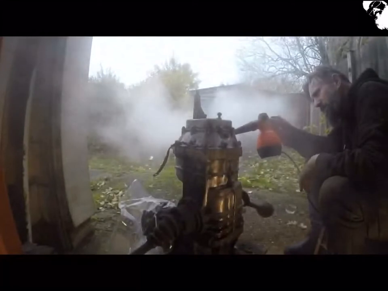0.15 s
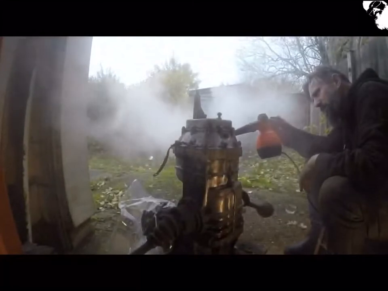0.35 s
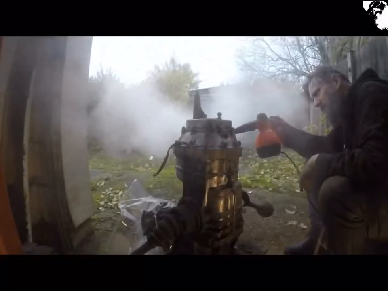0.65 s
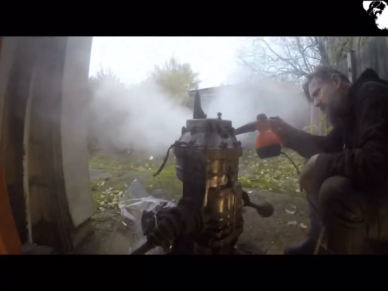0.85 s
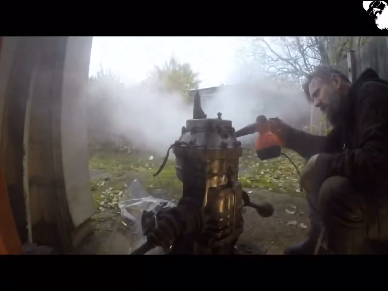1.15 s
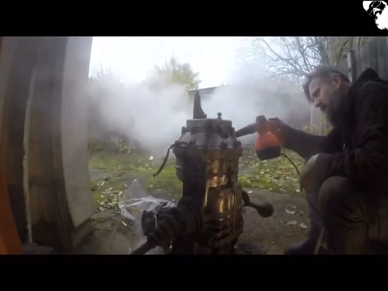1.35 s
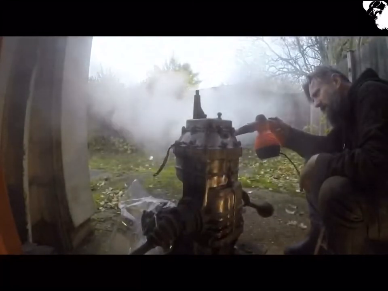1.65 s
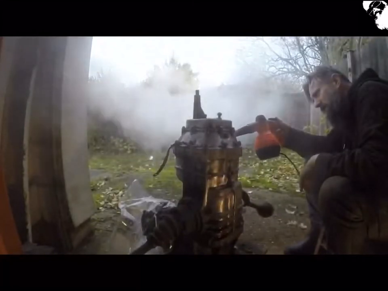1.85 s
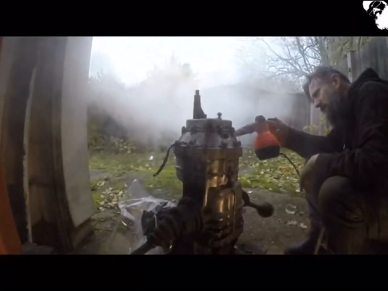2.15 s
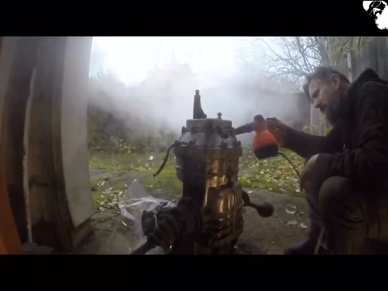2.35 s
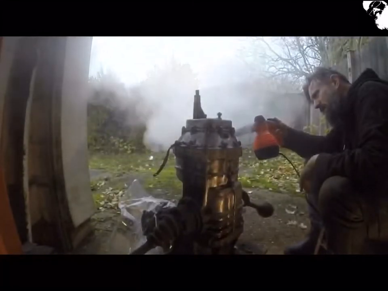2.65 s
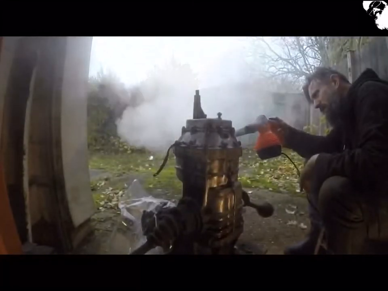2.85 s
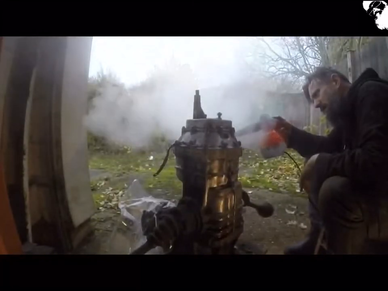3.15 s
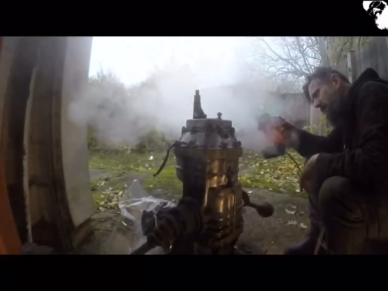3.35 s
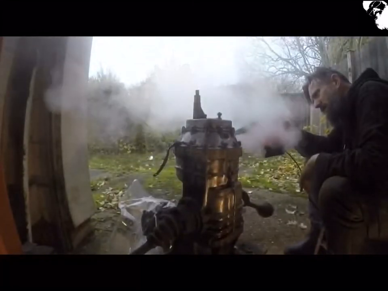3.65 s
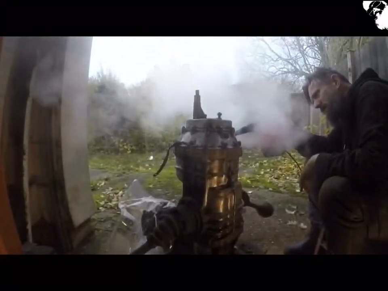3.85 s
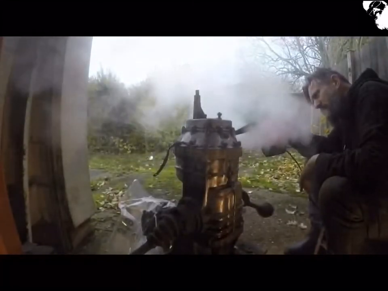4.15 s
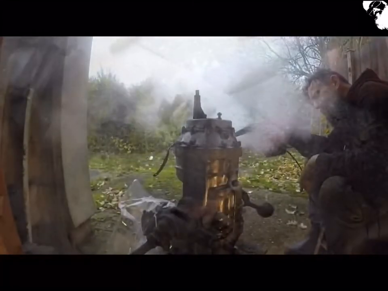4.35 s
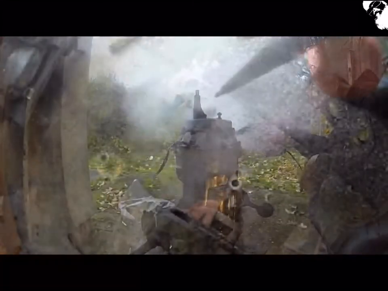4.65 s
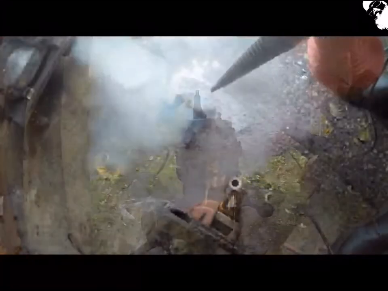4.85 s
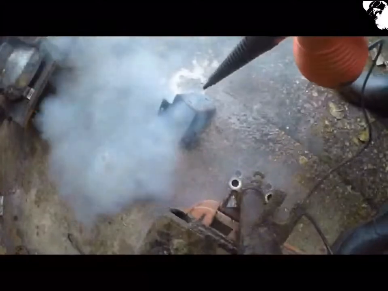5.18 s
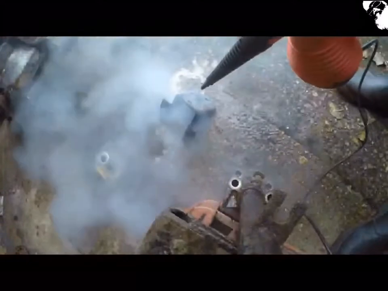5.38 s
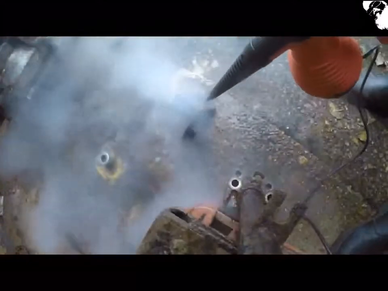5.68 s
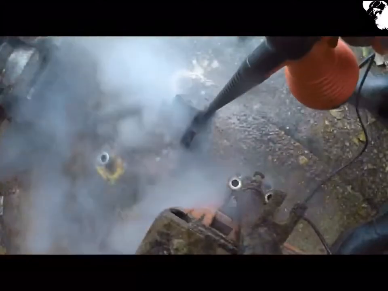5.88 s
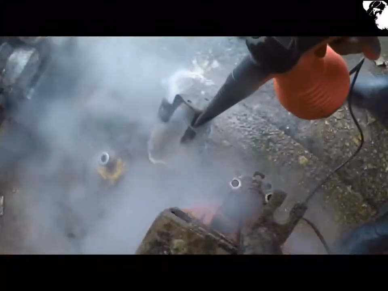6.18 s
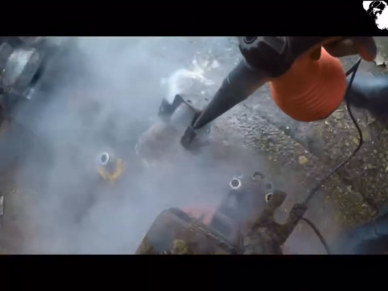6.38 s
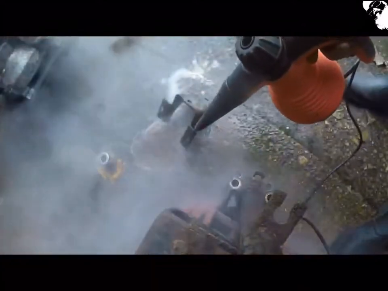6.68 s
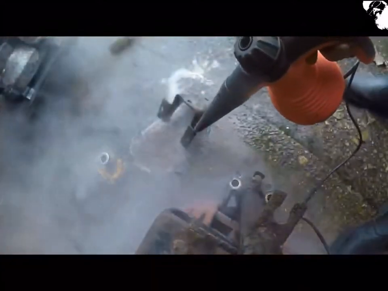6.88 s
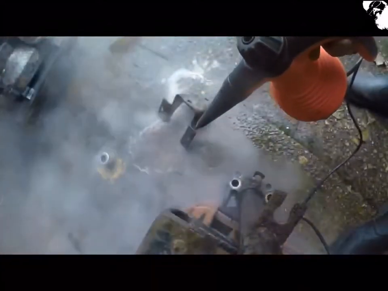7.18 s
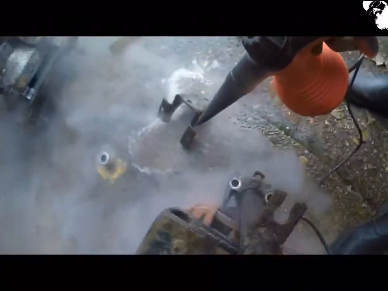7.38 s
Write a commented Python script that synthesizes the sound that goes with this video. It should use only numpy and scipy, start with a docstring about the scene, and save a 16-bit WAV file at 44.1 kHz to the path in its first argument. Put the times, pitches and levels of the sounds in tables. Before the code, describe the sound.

A handheld steam cleaner blasts a metal part in an open yard, without pause. From 0 to 4.4 s it is heard from a couple of metres: a fairly quiet, steady midrange rush with airy nozzle hiss, a wet spit and small rising gurgle around 0.1-0.2 s, more spits near 1.7, 2.8, 3.3 and 4.3 s. Between 2.4 and 3.6 s the aim shifts and the rush becomes narrower and more focused. Brief gusts ring hollows in the metal. At about 4.5 s the perspective jumps close above: louder, hollow roaring in a recess, uneven, with a faint deep hum at the change. From 5.8 s the jet leaves the recess, brighter and stronger; a piercing edge hiss peaks at 6.1 s, then a full wet, crackling wash from 6.2 to 7.05 s, a dip, quick bright surges, and hissing wash to the end. Faint low rumble throughout.

```python
"""A yard, outdoors: a handheld steam cleaner blasts a metal engine part, heard from a couple of metres, then
close above. From afar, coloured noise gives the rush on the metal, which changes with the aim, the nozzle hiss,
spits and a gurgle. Close up, the noise roars in a recess, washes over a wet flat and sings on an edge; random
clicks make its spray crackle. Gusts ring up hollows in the metal, and a late spit and its hiss tail brighten.
Behind lie a steady rumble and two spells of low sine hum. Mono on two channels."""
import sys
import numpy as np
from scipy.fft import rfft, irfft
from scipy.io import wavfile

SR = 44100
rng = np.random.default_rng(int(sys.argv[2]) if len(sys.argv) > 2 else 0)


def wrap_up_sound(samples):
    """Save the sound to the file named by the first command line argument, as 16-bit audio."""
    columns = np.atleast_2d(samples).T
    # keep every value between -1 and 1, then stretch to whole-number steps
    tamed = np.clip(columns, -1, 1)
    steps = np.round(tamed * 32767).astype(np.int16)
    wavfile.write(sys.argv[1], SR, steps)


N = 331632
TIME = np.arange(N) / SR
FREQ = np.maximum(np.arange(N // 2 + 1) * SR / N, 1)

# Distant rush on the metal, before and after the aim shifts: relative spectra [f/Hz, level/dB per Hz]
FIRST_AIM_SPECTRUM = [(300, -17), (700, -11), (1100, -9.5), (1500, -1.5), (2200, -1), (3000, -0.5),
                      (4000, 1), (5500, -3), (8000, -10.5), (15000, -15)]
SECOND_AIM_SPECTRUM = [(300, -24), (700, -21), (1100, -19), (1500, -8), (2200, -10.5), (3000, 0.5),
                       (4000, -2), (5500, -14), (8000, -14.5), (15000, -31)]
# Distant nozzle hiss and wet spits: relative spectra [f/Hz, level/dB per Hz]
FAR_HISS_SPECTRUM = [(1500, -26), (4000, -4), (5100, -6), (6200, -1.5), (8000, -2), (10000, -2),
                     (12000, -4), (15000, -10.5)]
SPIT_SPECTRUM = [(200, -24), (450, -7), (750, -2), (1100, -2.5), (1600, 4.5), (3500, 2.5), (6000, 0.5),
                 (12000, -10)]
# Resonances and notches between the steam and the far microphone, per aim: [f/Hz, width/Hz, level/dB]
FIRST_AIM_RESONANCES = [(1054, 43, 6.7), (1662, 36, 7.6), (1824, 143, 5.8), (2024, 107, -4.5),
                        (2246, 204, 6.3), (2738, 101, 7.7), (3148, 440, 11.3), (3429, 109, -8.9),
                        (3734, 232, 11.1), (3939, 165, 5.4), (4666, 193, 6.6)]
SECOND_AIM_RESONANCES = [(1056, 43, 10.2), (1659, 52, 2.1), (2057, 115, -1.2), (2348, 93, 10.5),
                         (2762, 101, 4.4), (3124, 70, 4.9), (3442, 104, -10.0), (3687, 237, 5.9),
                         (4715, 143, 9.0)]
# Treble resonances and notches shared by all the far steam: [f/Hz, width/Hz, level/dB]
FAR_TREBLE_RESONANCES = [(5748, 400, 2.2), (6016, 75, 2.5), (6681, 393, 2.2), (6990, 70, -3.9),
                         (7704, 104, 3.2), (7922, 70, 4.3), (8761, 104, 3.4), (10020, 117, 2.8),
                         (10391, 400, -2.2), (11476, 400, 2.1), (14200, 206, -2.0)]
# Slugs of water spat out, and flares of dry steam past the metal: bell swells [t/s, standard deviation/s, level/dB]
SPIT_SWELLS = [(0.115, 0.047, -36), (1.692, 0.02, -36), (1.733, 0.02, -36), (2.78, 0.049, -43),
               (3.266, 0.016, -40), (4.345, 0.028, -36)]
FLARE_SWELLS = [(0.0, 0.021, -42), (.29, 0.076, -47), (1.6, .04, -47), (2.42, 0.065, -40.5),
                (2.66, .04, -46), (3.02, 0.06, -42.5), (3.48, 0.24, -43.5)]
# Gurgle in the nozzle: [t/s, centre f/Hz, level/dB]
GURGLE_CURVE = [(.03, 717, -77), (.08, 678, -60), (.13, 786, -56), (.17, 1007, -58), (.22, 1100, -80)]

# Close roar deep in the recess and at its mouth: relative spectra [f/Hz, level/dB per Hz]
DEEP_ROAR_SPECTRUM = [(120, -21.5), (300, -26), (500, -18.5), (750, -15), (1050, -11), (1330, 0.5),
                      (1650, -1), (2100, -5), (3000, -51), (6000, -19)]
SHALLOW_ROAR_SPECTRUM = [(300, -38.5), (750, -27), (1050, -16), (1350, -6), (1800, 1.5), (2250, 0.5),
                         (3000, -6.5), (6000, -19)]
# Close wash, singing edge and nozzle hiss: relative spectra [f/Hz, level/dB per Hz]
WASH_SPECTRUM = [(500, -37.5), (1100, -32), (1700, -13.5), (2250, -3.0), (2900, -3), (3600, -4),
                 (4500, -5.5), (5800, -5.5), (7500, -16.5), (15000, -18)]
EDGE_SPECTRUM = [(2000, -38.5), (3400, -13.5), (3850, -7.5), (4200, 0), (4700, -6), (6000, -6.5),
                 (7300, -8.5), (7780, -6.5), (8300, -12.5), (15000, -35)]
NEAR_HISS_SPECTRUM = [(500, -20), (1500, -11.5), (3000, -3), (4000, -1.5), (6000, 1.5), (8500, 1),
                      (11000, 1.5), (13500, 2), (15000, 2.5)]
# Close resonances and notches, shared and added by each spot: [f/Hz, width/Hz, level/dB]
NEAR_RESONANCES = [(1986, 291, -4.9), (2050, 73, -5.7), (2181, 138, 3.2), (2614, 134, -5.2),
                   (2766, 170, 7.4), (3059, 164, 5.3), (3448, 90, -6.2), (3513, 400, 4.4), (3837, 82, 3.7),
                   (3936, 239, 3.2), (3955, 106, 3.3), (4157, 311, 3.0), (4305, 99, 2.2), (4809, 77, -3.7),
                   (5384, 77, 3.0), (5788, 132, -4.5), (6373, 188, -3.3), (6587, 91, -3.8),
                   (6959, 113, -4.2), (7047, 250, -1.7), (7341, 140, -2.3), (7738, 400, 5.0),
                   (9661, 338, 2.4), (10259, 400, -2.1), (11892, 338, -3.5)]
RECESS_RESONANCES = [(2730, 130, -1), (3160, 160, 4), (3820, 180, 3), (4270, 220, -3), (5360, 140, -1),
                     (7500, 160, 5), (7900, 270, -2), (8400, 180, 2.5), (11100, 400, 3), (12400, 400, 1)]
FLAT_RESONANCES = [(2470, 41, -1), (2780, 61, 4), (3700, 300, 0), (4400, 72, 2.5), (4930, 140, 0.5),
                   (6080, 89, 1), (7950, 120, -1), (8900, 550, -1.5), (9500, 300, 1), (12600, 400, 2)]
# Close roar as the jet points into the recess and out again: [t/s, level/dB]
ROAR_CURVE = [(4.5, -46.5), (4.71, -41.5), (4.83, -35.5), (5.14, -33.5), (5.3, -40), (5.63, -40.5),
              (5.75, -53.5), (5.9, -31.5), (6.1, -31), (6.19, -40.5), (6.27, -34), (6.42, -40), (7.03, -40),
              (7.16, -43), (7.23, -35.5), (7.47, -31)]
# Close nozzle hiss, which follows the flow of steam, before NOZZLE_GAIN_DB: [t/s, level/dB]
NOZZLE_CURVE = [(4.44, -38), (4.5, -32), (4.63, -31.5), (5.56, -38.5), (5.74, -36), (5.77, -31),
                (5.83, -27), (6.09, -32), (6.14, -30), (6.2, -29.5), (6.25, -38), (6.64, -34),
                (6.76, -40.5), (6.99, -32.5), (7.13, -40), (7.24, -33.5), (7.52, -30)]
# Passes over the wet flat, before flow and waver: [start t/s, end t/s, level/dB]
FLAT_PASSES = [(4.87, 5.18, -36), (5.77, 5.96, -33.5), (6.23, 7.06, -25), (7.33, 7.6, -29.5)]
# Grazes of the edge, before waver: bell swells [t/s, standard deviation/s, level/dB]
EDGE_GRAZES = [(4.55, .07, -35), (5.42, 0.15, -39.5), (5.82, .05, -29), (6.135, 0.051, -20.5),
               (6.27, 0.046, -34.5), (6.57, 0.057, -30.5), (6.96, .04, -35.5), (7.22, 0.017, -27.5),
               (7.32, 0.033, -24.5), (7.44, 0.052, -28.5)]
# Brief swells of a resonant band: gusts that catch a hollow, and at 4.345 s and 4.394 s the spit and its hiss
# tail brightening: [t/s, standard deviation/s, centre f/Hz, boost level/dB]
BAND_SWELLS = [(0.625, 0.012, 3180, 2.5), (1.263, .025, 3000, 2.5), (1.385, 0.019, 2900, 6.5),
               (1.695, 0.01, 3800, 4), (2.31, .04, 3850, 6.5), (2.732, 0.0082, 3090, 9),
               (3.872, 0.018, 3080, 2), (4.345, 0.016, 3300, 4.5), (4.394, 0.056, 5300, 8),
               (6.376, 0.014, 3400, 6), (6.86, 0.0097, 2800, 4)]
# Spells of hum: [start t/s, end t/s, level/dB]
HUM_SPELLS = [(4.167, 4.548, -48.5), (5.77, 5.93, -55)]
# Outdoor rumble of the yard: relative spectrum [f/Hz, level/dB per Hz]
YARD_SPECTRUM = [(15, -6.5), (35, 0.5), (60, -3.5), (100, -9.5), (160, -14), (215, -13), (300, -23.5),
                 (450, -16.5), (700, -20), (1500, -22.5)]

# (start s, end s): the nozzle moves to a new spot, the microphone moves close, the jet leaves the recess
AIM_SHIFT, MOVES_CLOSE, LEAVES_RECESS = (2.35, 3.6), (4.43, 4.54), (5.7, 5.8)
FIRST_RUSH_DB, SECOND_RUSH_DB, FAR_HISS_DB = -39, -37.5, -44
CHOKE_DB = -39  # a spit at this level halves the power of the nozzle hiss
NOZZLE_GAIN_DB = 4
WASH_FOLLOWS = 0.23  # share of the flow's dB swing that the wash follows
FLAT_SLIDE_S = 0.093  # time to slide on to or off the flat
FLAT_FRINGE_DB, EDGE_FRINGE_DB = -35.5, -44  # the jet's fringe always reaches both
WAVER_DB, WAVER_HZ = 0.5, 7.5  # spread and speed of the hand-held jet's wavering
HOLLOW_WIDTH_HZ = 1100
HUM_HZ = 37.3
CUTOFF_HZ = 15350


def far_jet():
    """From a couple of metres, impact on metal, nozzle hiss, spits and gurgle add up."""
    walls = reflections(level_db=-4.5, first_s=0.004, decay_s=0.015) * resonances(FAR_TREBLE_RESONANCES)
    slugs = swells(SPIT_SWELLS)
    return far_rush(walls) + far_hiss(walls, slugs) + spits(walls, slugs) + gurgle(width_hz=72)


def far_rush(walls):
    """Turbulence on the metal changes colour as the aim shifts and wavers with the hand."""
    impact = wet_steam(flutter_db=0.9, flutter_hz=35, drops_per_s=700, spray_db=-14.5)
    first = sounded(impact, FIRST_AIM_SPECTRUM, walls * resonances(FIRST_AIM_RESONANCES))
    second = sounded(impact, SECOND_AIM_SPECTRUM, walls * resonances(SECOND_AIM_RESONANCES))
    share = np.interp(TIME, AIM_SHIFT, (0, 1))
    rush = (1 - share) * from_db(FIRST_RUSH_DB) * first
    rush = rush + share * from_db(SECOND_RUSH_DB) * second
    return waver() * rush


def far_hiss(walls, slugs):
    """Dry steam hisses from the nozzle, flares past the metal and is choked by slugs of water."""
    steam = wet_steam(flutter_db=1.0, flutter_hz=30, drops_per_s=790, spray_db=-6)
    hiss = sounded(steam, FAR_HISS_SPECTRUM, walls)
    dry_flow = np.hypot(from_db(FAR_HISS_DB), swells(FLARE_SWELLS))
    choked_flow = dry_flow / np.hypot(1, slugs / from_db(CHOKE_DB))
    return waver() * choked_flow * hiss


def spits(walls, slugs):
    """Slugs of water splutter as short swells of strongly fluttering noise."""
    splutter = wet_steam(flutter_db=3.5, flutter_hz=60, drops_per_s=440, spray_db=-7.5)
    return slugs * sounded(splutter, SPIT_SPECTRUM, walls * resonances(FIRST_AIM_RESONANCES))


def gurgle(width_hz):
    """A narrow noise resonance dips, then rises in pitch as water clears from the nozzle."""
    hz, db = in_time(GURGLE_CURVE)
    phase = 2 * np.pi * np.cumsum(hz) / SR
    sounding = (TIME > GURGLE_CURVE[0][0]) & (TIME < GURGLE_CURVE[-1][0])
    # two independent slow noises turn a gliding carrier into a narrow band
    band = drift(width_hz) * np.cos(phase) + drift(width_hz) * np.sin(phase)
    return sounding * from_db(db) * band


def near_jet():
    """Close above, the aim shares the steam between recess, flat and edge, each spot adding resonances."""
    response = reflections(level_db=-10.5, first_s=0.0039, decay_s=0.012) * resonances(NEAR_RESONANCES)
    (hiss_db,) = in_time(NOZZLE_CURVE)
    steam = recess_roar(response) + flat_wash(response, hiss_db)
    steam = steam + edge_song(response) + near_hiss(response, hiss_db)
    spectrum = rfft(steam)
    in_recess = irfft(spectrum * resonances(RECESS_RESONANCES), N)
    on_flat = irfft(spectrum * resonances(FLAT_RESONANCES), N)
    return fade(in_recess, on_flat, LEAVES_RECESS)


def recess_roar(response):
    """Eddies roar in the recess, higher in pitch as the jet slides out of it."""
    (roar_db,) = in_time(ROAR_CURVE)
    eddies = wet_steam(flutter_db=0.04, flutter_hz=40, drops_per_s=280, spray_db=-21)
    deep = sounded(eddies, DEEP_ROAR_SPECTRUM, response)
    shallow = from_db(1.5) * sounded(eddies, SHALLOW_ROAR_SPECTRUM, response)
    return from_db(roar_db) * fade(deep, shallow, LEAVES_RECESS)


def flat_wash(response, hiss_db):
    """Steam and spray wash over the wet flat, partly following the flow from the nozzle."""
    steam = wet_steam(flutter_db=0.5, flutter_hz=45, drops_per_s=1500, spray_db=-8.5)
    flow = from_db(WASH_FOLLOWS * (hiss_db - np.mean(NOZZLE_CURVE, axis=0)[1]))
    gain = dwell(FLAT_PASSES, FLAT_SLIDE_S, FLAT_FRINGE_DB)
    return flow * gain * sounded(steam, WASH_SPECTRUM, response)


def edge_song(response):
    """Banded noise sings in short swells as the jet grazes an edge, above its steady fringe."""
    steam = wet_steam(flutter_db=1.8, flutter_hz=30, drops_per_s=640, spray_db=-31)
    gain = np.hypot(from_db(EDGE_FRINGE_DB), swells(EDGE_GRAZES))
    return waver() * gain * sounded(steam, EDGE_SPECTRUM, response)


def near_hiss(response, hiss_db):
    """Turbulent steam hisses at the nozzle, its level following the flow."""
    steam = wet_steam(flutter_db=0.9, flutter_hz=40, drops_per_s=1200, spray_db=-14.5)
    return from_db(hiss_db + NOZZLE_GAIN_DB) * sounded(steam, NEAR_HISS_SPECTRUM, response)


def gusty(steam):
    """For each row a resonant band of the steam swells for a moment: a gust catching a hollow, or a spit and
    its hiss tail brightening."""
    spectrum, out = rfft(steam), steam
    for s, length, hz, db in BAND_SWELLS:
        hollow = irfft(spectrum / (1 + (2 * (FREQ - hz) / HOLLOW_WIDTH_HZ) ** 2), N)
        out = out + bell(s, length) * (from_db(db) - 1) * hollow
    return out


def wet_steam(flutter_db, flutter_hz, drops_per_s, spray_db):
    """Fluttering turbulence is noise; droplets flung against the metal are sparse random clicks."""
    turbulence = rng.standard_normal(N) * from_db(flutter_db * drift(flutter_hz))
    drops = (rng.random(N) < drops_per_s / SR) * rng.standard_normal(N)
    return turbulence + from_db(spray_db) * rms_one(drops)


def waver():
    """Gain wanders by chance with the unsteady hand."""
    return from_db(WAVER_DB * drift(WAVER_HZ))


def dwell(rows, slide_s, fringe_db):
    """The jet slides on, holds and slides off; powers add to its fringe, and the whole wavers."""
    power = from_db(fringe_db) ** 2
    for start, end, db in rows:
        power = power + (from_db(db) * spell(start, end, slide_s)) ** 2
    return np.sqrt(power) * waver()


def reflections(level_db, first_s, decay_s):
    """Direct sound plus a short decaying cloud of echoes from nearby surfaces ripples the spectrum."""
    cloud = rng.standard_normal(N) * np.exp(-TIME / decay_s) * (TIME > first_s)
    return 1 + from_db(level_db) * rfft(cloud / np.linalg.norm(cloud))


def resonances(peaks):
    """Bell-shaped peaks and notches add in dB to a gain at every frequency."""
    return from_db(sum(db / (1 + (2 * (FREQ - hz) / width) ** 2) for hz, width, db in peaks))


def sounded(drive, spectrum, response=1):
    """A source colour and an acoustic path filter the drive, scaled to unit rms."""
    return rms_one(irfft(rfft(drive) * colour(spectrum) * response, N))


def colour(points):
    """Gain at every frequency, interpolated in dB over log frequency."""
    hz, db = np.transpose(points)
    return from_db(np.interp(np.log(FREQ), np.log(hz), db))


def drift(rate):
    """Slow noise of unit rms, its amplitude response halved at the rate in Hz."""
    return rms_one(irfft(rfft(rng.standard_normal(N)) / (1 + (FREQ / rate) ** 2), N))


def swells(rows):
    """Summed gain of a table of bell-shaped swells."""
    return sum(from_db(db) * bell(s, length) for s, length, db in rows)


def bell(s, length):
    """Gaussian swell of height 1, its length the standard deviation in seconds."""
    return np.exp(-0.5 * ((TIME - s) / length) ** 2)


def spell(start, end, ramp_s):
    """Gate with linear ramps centred on its start and end."""
    return np.clip(np.minimum(TIME - start, end - TIME) / ramp_s + 0.5, 0, 1)


def fade(a, b, span):
    """One sound gives way to another with complementary power gains."""
    share = np.clip((TIME - span[0]) / max(span[1] - span[0], 1e-3), 0, 1)
    return np.sqrt(1 - share) * a + np.sqrt(share) * b


def in_time(rows):
    """Each column of a curve table, interpolated at every sample."""
    s, *columns = np.transpose(rows)
    return [np.interp(TIME, s, c) for c in columns]


def from_db(db):
    """Decibels to amplitude gain."""
    return 10 ** (np.asarray(db) / 20)


def rms_one(x):
    """Scale to unit rms."""
    return x / np.sqrt(np.mean(x ** 2) + 1e-20)


def hum():
    """A deep sine sounds in short spells with linear ramps."""
    gain = sum(from_db(db) * spell(start, end, ramp_s=0.04) for start, end, db in HUM_SPELLS)
    return gain * np.sqrt(2) * np.sin(2 * np.pi * HUM_HZ * TIME)  # root 2 gives the sine unit rms


def yard():
    """Steady coloured noise makes the low outdoor rumble."""
    return from_db(-54) * sounded(rng.standard_normal(N), YARD_SPECTRUM)


def scene():
    """The microphone moves from afar to close above the part, over the yard and hum."""
    steam = gusty(fade(far_jet(), near_jet(), MOVES_CLOSE))
    mono = steam + yard() + hum()
    return np.tile(mono, (2, 1))


def record(dry):
    """A very steep low-pass removes the top above the cutoff."""
    return irfft(rfft(dry) / np.sqrt(1 + (FREQ / CUTOFF_HZ) ** 400), N)


dry = scene()
out = record(dry)
wrap_up_sound(out)
```